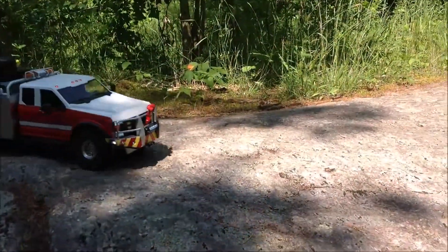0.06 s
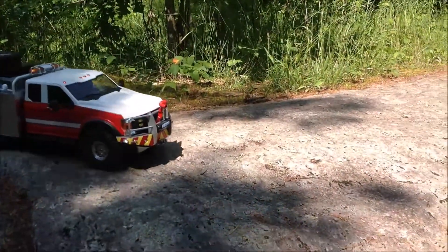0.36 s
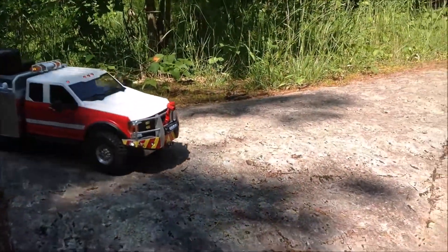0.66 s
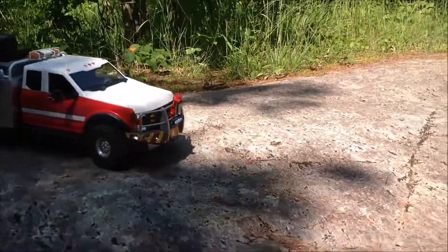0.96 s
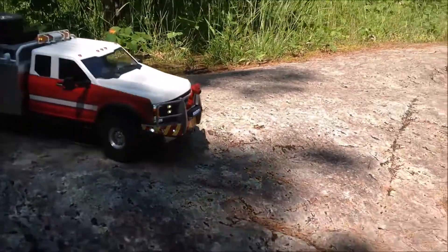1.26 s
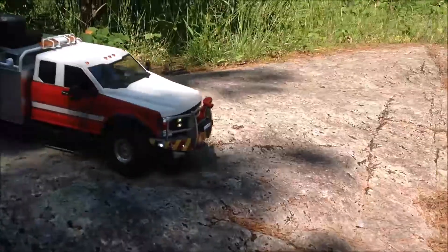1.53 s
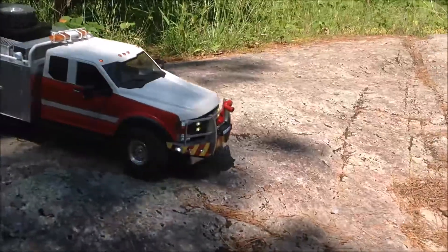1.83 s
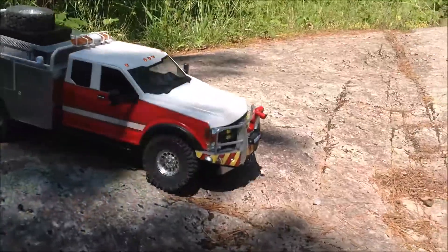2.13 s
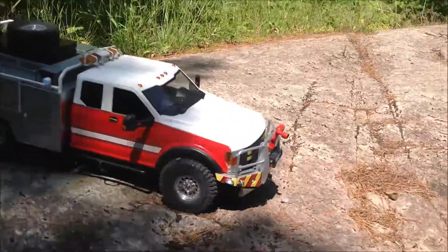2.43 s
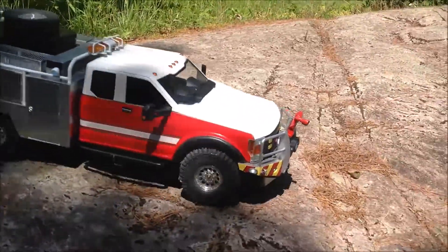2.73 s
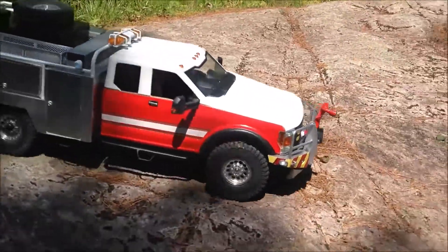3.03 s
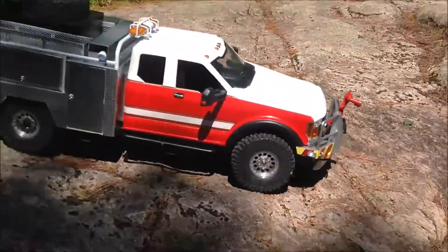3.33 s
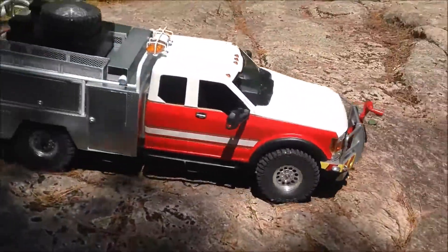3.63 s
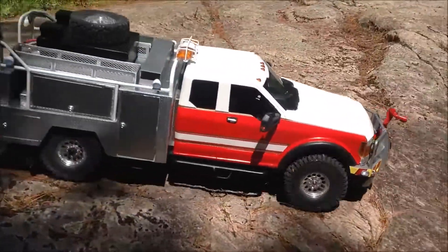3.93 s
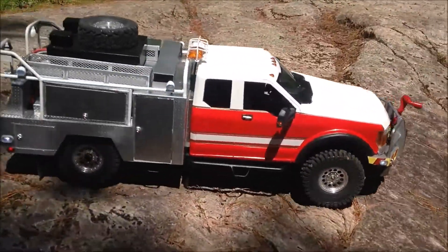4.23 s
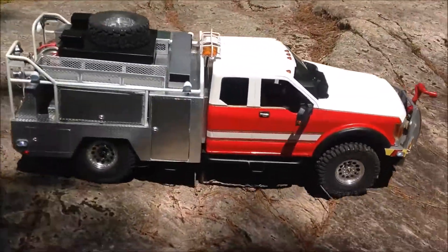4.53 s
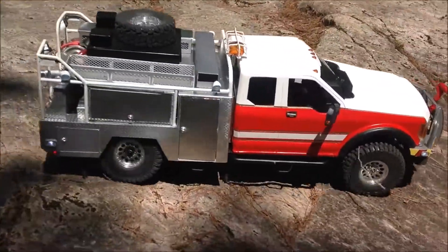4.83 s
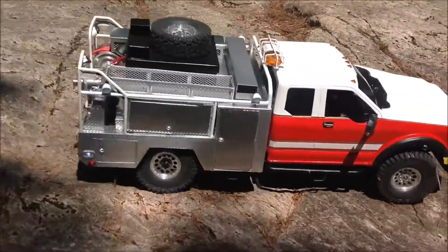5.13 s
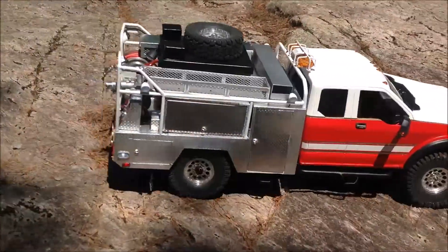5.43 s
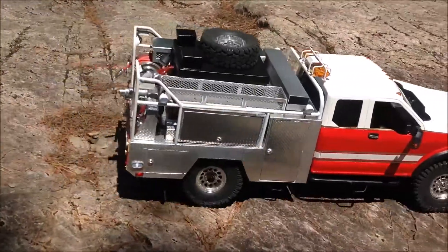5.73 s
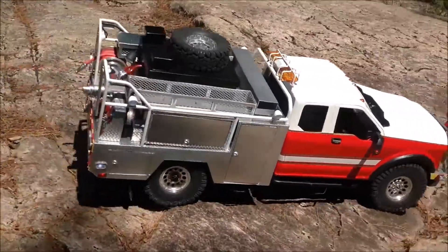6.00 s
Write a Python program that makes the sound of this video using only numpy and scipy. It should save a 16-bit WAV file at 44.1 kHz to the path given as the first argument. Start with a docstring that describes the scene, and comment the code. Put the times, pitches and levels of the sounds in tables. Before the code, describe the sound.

A small remote-controlled truck crawls over rock outdoors, heard close up for about six seconds. From the start, its electric motor and gears make a wavering, mid-pitched whine with a grinding rasp that pulses roughly twenty times a second. The whine steps up and down with the throttle, highest from about 1.9 to 2.5 seconds, then eases down. Around 4.3 seconds it drops lower and the pulsing slows; it picks up near 5.1 seconds and sags again just after 6. Tiny metallic pings and light clicks from the gears are scattered through, clustering between 2 and 3.5 seconds. A faint, thin, very high motor whistle swells around 1.4 seconds and again near 4. Underneath, rubber tyres scuff dully and quietly on the stone, and a low, steady hush of air and distant foliage continues throughout.

```python
"""Outdoors on bare rock, a radio-controlled truck crawls close by over a low, steady hush.
Its electric motor drives a slightly off-centre gear. The teeth whine at their meshing rate and rasp
where they bind, once a turn, forcing the gearbox, gear cover and body shell into resonance.
Teeth ping and snap free, the rubber tyres scuff, and twice the motor brushes sing thinly."""
import sys
import numpy as np
from scipy import signal
from scipy.fft import rfft, irfft, next_fast_len
from scipy.io import wavfile

SR = 44100
rng = np.random.default_rng(int(sys.argv[2]) if len(sys.argv) > 2 else 0)


def dump_mix(stems):
    """Bounce the given channels to the path in sys.argv[1] as a 16-bit WAV at rate SR."""
    frames = np.atleast_2d(stems).T  # one column per channel
    limited = np.clip(frames, -1, 1)  # hard clip at full scale
    pcm = np.round(limited * 32767).astype(np.int16)
    wavfile.write(sys.argv[1], SR, pcm)


N = 276066
TIME = np.arange(N) / SR

# spectrum of the outdoor background: frequency_hz, relative_db
HUSH_SPECTRUM = [(25, -36), (55, -30), (70, -23), (88, -11), (100, -10), (120, -8.5), (190, 0.5),
                 (300, -0.5), (420, -8.5), (700, -10), (1200, -6), (3000, -9), (6000, -66), (15000, -66)]
# rotation of the off-centre gear under the throttle: time_s, turns_per_s
GEAR_SPEED = [(0.0, 17.35), (0.31, 19.66), (0.38, 18.35), (1.08, 16.71), (1.17, 18.73), (1.38, 20.96),
              (1.57, 19.44), (1.74, 21.17), (2.37, 21.93), (2.8, 20.21), (3.08, 20.17), (3.26, 18.42),
              (3.6, 21.08), (3.77, 18.14), (4.22, 17.93), (4.28, 13.82), (4.48, 15.2), (4.68, 13.9),
              (4.97, 15.08), (5.06, 18.49), (5.27, 16.63), (5.56, 18.29), (6.05, 15.72), (6.26, 12.28)]
# meshing rate before the binds bend it, rising at each blip of the throttle: time_s, pitch_hz
WHINE_PITCH = [(.07, 772), (.18, 935), (.33, 890), (.6, 890), (.8, 770), (.95, 770), (1.02, 885),
               (1.19, 885), (1.3, 938), (1.7, 915), (1.9, 1150), (1.97, 980), (2.06, 990), (2.11, 1070),
               (2.42, 1098), (2.52, 1085), (2.57, 965), (3.05, 945), (3.26, 885), (3.32, 938), (3.42, 925),
               (3.56, 960), (3.62, 1000), (3.7, 925), (3.9, 870), (4.16, 892), (4.22, 785), (4.37, 665),
               (4.51, 728), (4.62, 660), (4.76, 645), (4.97, 742), (5.12, 900), (5.2, 815), (5.37, 805),
               (5.5, 860), (5.65, 882), (5.85, 755), (5.98, 800), (6.14, 648)]
# load on the drive train: time_s, rasp_at_bind_db, grinding_between_db, whine_relative_db
DRIVE_LOAD = [(0.0, -28.5, -45.5, -20), (0.18, -24, -25, -10), (0.26, -26.5, -38.5, -16),
              (0.89, -26.5, -41.5, -20.5), (1.35, -24, -27.5, -11), (1.59, -26, -37.5, -21),
              (1.75, -22.5, -24, -11), (1.95, -27.5, -33, -17), (2.05, -23.5, -26.5, -15),
              (3.12, -21.5, -27, -10.5), (3.2, -21.5, -36.5, -13.5), (3.28, -19.5, -28, -10.5),
              (3.58, -23.5, -24.5, -7), (3.72, -24, -33.5, -10), (4.11, -21.5, -24.5, -12),
              (4.21, -23.5, -43, -13), (4.45, -28, -31.5, -5), (4.71, -24.5, -41, -9),
              (4.79, -27.5, -31, -6), (5.09, -21.5, -24.5, -7), (5.17, -23, -32.5, -10.5),
              (5.52, -23, -27, -8), (5.78, -23, -33, -10), (5.92, -24.5, -28, -12), (6.12, -27, -41.5, -12),
              (6.26, -22, -41, -5)]
# jolts that make a bind bite harder or slip past: time_s, rasp_change_db
JOLTS = [(.384, -15), (.436, 1), (.6, 0.5), (.776, -13), (1.528, -9.5), (1.63, -7), (1.872, 1), (1.961, -3),
         (2.425, -5.5), (2.47, -0.5), (3.26, -2.5), (3.37, -4.5), (3.42, -1.5), (3.47, -0.5), (3.82, -6.5),
         (3.88, 1.5), (4.41, -1), (4.48, 3.5), (5.43, -1.5), (6.072, -25)]
# sidebands and tones of the other gears: tooth_rate_multiple, relative_db, blur_hz
GEAR_PARTIALS = [(.85, -9, 45.4), (1.1, -7.5, 50.3), (1.6, -13, 50), (1.91, -9, 44.2), (2.05, -10.5, 45),
                 (2.55, -14, 50), (2.8, -12, 45), (3.27, -9.5, 44), (4.14, -8, 50), (5.13, -12, 55)]
# broad response of the gearbox: frequency_hz, relative_db
GEARBOX_SPECTRUM = [(40, -70), (150, -23), (400, -20.5), (640, -3), (1000, -5), (1230, -4), (1500, -0.5),
                    (1850, -0.5), (2090, 1), (2400, 4.5), (3150, 0.5), (3500, -1), (3900, -2), (4300, -5),
                    (5000, -15.5), (5700, -29), (15000, -12.5)]
# its resonances: centre_hz, width_hz, lift_db
GEARBOX_MODES = [(635, 49, 5), (2370, 90, 1.5), (3570, 70, 2.5), (3770, 90, 5.5), (4650, 130, 6),
                 (7030, 130, 4), (7600, 290, 5.5), (9170, 220, 4)]
# harmonics of the whine: tooth_rate_multiple, relative_db
OVERTONES = [(2, 1), (3, -0.5), (4, -4), (5, -5)]
# how clearly they ring out of the rattle: time_s, relative_db
OVERTONE_CLARITY = [(0, -14), (.18, -8), (.4, -15), (1.1, -15), (1.35, -9), (1.6, -14), (1.75, -10),
                    (2.3, -10), (2.65, -12), (3.0, -8), (3.2, -10), (3.35, -6), (3.65, -7), (3.8, -12),
                    (4.1, -9), (4.3, -12), (4.5, -8), (4.85, -7), (5.1, -7), (5.25, -11), (5.55, -7),
                    (5.8, -11), (6.26, -11)]
# gear train resonances that they glide across: frequency_hz, gain_db
TRAIN_RESPONSE = [(1250, 1), (1450, -1), (1620, -5), (1750, -1), (1900, 2), (2150, -6), (2380, -8),
                  (2550, -1), (2780, 1), (3000, -2), (3250, -1), (3500, -7), (3800, 3), (4100, -5),
                  (4400, -12), (4650, -2), (5200, -14)]
# excitation of the gear cover: time_s, relative_db
COVER_DRIVE = [(0, -4.5), (.6, -14.5), (1.3, -5.5), (1.75, -11), (2.15, -4.5), (2.6, -8.5), (3.3, -28),
               (3.9, -9.5), (4.35, -5.5), (4.7, -8.5), (4.95, -25), (5.7, -11), (6.26, -23)]
# excitation of the shell's main mode as the chassis flexes: time_s, relative_db
SHELL_DRIVE = [(0, -12), (.3, -10), (.5, 0), (.9, -6), (1.15, -1), (1.4, -9.5), (2, -3), (3, -10.5),
               (3.6, -5.5), (4, -1), (4.3, -8), (4.8, -4), (5.1, -5.5), (5.5, -2), (5.9, -4), (6.26, 0)]
# spectrum of teeth sliding on each other: frequency_hz, relative_db
SCRAPE_SPECTRUM = [(60, -64), (1000, -38), (3000, 2.5), (5000, 6), (6300, 2.5), (8500, 2.5), (10500, 0.5),
                   (13000, -2), (14500, 0), (15300, 2.5)]
# tyres rubbing over the rock: time_s, level_db
TYRE_LEVEL = [(0, -53), (1.1, -54), (1.35, -44), (1.5, -49), (1.65, -41), (1.8, -49), (2.5, -46),
              (3.5, -47), (4.5, -50), (5.2, -51.5), (5.5, -44.5), (6.0, -47.5), (6.26, -60)]
# their dull spectrum: frequency_hz, relative_db
TYRE_SPECTRUM = [(100, -67), (300, -4), (480, 4), (600, 5.5), (800, -1), (1500, -27), (5000, -75)]
# metallic pings of the gears: peak_s, pitch_hz, relative_db
PINGS = [(0.014, 3171, -27.5), (0.125, 2610, -23.5), (.187, 2890, -27.5), (0.894, 3225, -28.5),
         (1.237, 2690, -23.5), (1.285, 2860, -26), (1.733, 3020, -22.5), (2.059, 2977, -19.5),
         (2.153, 2970, -21), (2.38, 3340, -29), (2.428, 3300, -28), (2.52, 3180, -25), (2.569, 3320, -28),
         (2.662, 3200, -25.5), (3.106, 3790, -33), (3.267, 2540, -22.5), (3.316, 3770, -24),
         (3.341, 2760, -26), (3.369, 1890, -23), (3.473, 3740, -30), (4.045, 2630, -23.5),
         (4.112, 2770, -30), (5.088, 2560, -26), (5.494, 2503, -22), (5.545, 2600, -29), (5.644, 2680, -24)]
# teeth that catch and snap free: start_s, force_db
SNAPS = [(.123, -22), (1.067, -37), (1.233, -23.5), (2.055, -22), (2.424, -18), (3.056, -18), (3.363, -18),
         (3.416, -30), (3.469, -17), (3.765, -25), (5.369, -22)]
# spells of brush singing: start_s, peak_s, end_s, level_db, first_hz, last_hz
BRUSH_SPELLS = [(1.0, 1.36, 1.56, -42.5, 9330, 8950), (3.5, 4.08, 4.16, -42, 9220, 9260)]


def amp(db):
    """Amplitude ratio of a level in decibels."""
    return 10 ** (np.asarray(db) / 20)


def unit_rms(x):
    """Normalisation to an rms of 1."""
    return x / np.sqrt(np.mean(x ** 2) + 1e-20)


def curves(rows):
    """Linear interpolation of each column of a time table."""
    times, *columns = np.transpose(rows)
    return [np.interp(TIME, times, column) for column in columns]


def wander(hz):
    """Low-pass noise: random motion of rms 1, no faster than about hz."""
    step = 8
    size = next_fast_len(N // step)
    f = np.fft.rfftfreq(size, step / SR)
    slow = irfft(rfft(rng.standard_normal(size)) / (1 + (f / hz) ** 4), size)
    return unit_rms(np.interp(np.arange(N), step * np.arange(size), slow))


def blurred_tone(cycles, blur_hz):
    """Random modulation of amplitude and phase spreads a tone into a narrow band."""
    phase = 2 * np.pi * cycles
    return wander(blur_hz) * np.cos(phase) + wander(blur_hz) * np.sin(phase)


def colour(x, spectrum, modes=()):
    """Minimum-phase filter of unit energy: a broad spectrum with resonances that ring on."""
    f = abs(np.fft.fftfreq(4096, 1 / SR))
    hz, db = np.transpose(spectrum)
    shape_db = np.interp(np.log(f + 1), np.log(hz), db)
    for centre, width, lift in modes:
        shape_db += lift / (1 + (2 * (f - centre) / width) ** 2)
    log_response = np.conj(signal.hilbert(np.log(amp(shape_db))))
    taps = np.fft.ifft(np.exp(log_response)).real
    return signal.oaconvolve(x, taps / np.linalg.norm(taps))[:N]


def resonate(x, hz, width_hz):
    """Forced response of one damped mode of unit energy."""
    b, a = signal.iirpeak(hz, hz / width_hz, fs=SR)
    return signal.lfilter(b, a, x) * np.sqrt(SR / (np.pi * width_hz))


def hush(level_db=-41.5):
    """Broadband noise of air and distant foliage, almost constant in level."""
    return amp(level_db + .4 * wander(4)) * colour(rng.standard_normal(N), HUSH_SPECTRUM)


def gear_turns(first_bind_turns=.2016):
    """Rotation is the integral of speed; the off-centre gear binds at each whole turn."""
    return np.cumsum(curves(GEAR_SPEED)[0]) / SR - first_bind_turns


def gear_binds(typical_s=.0175, jolt_reach_s=.02):
    """Eccentricity binds the gear once a turn. Rows: time_s, length_s, rasp_db, grinding_after_db."""
    turns = gear_turns()
    times = np.interp(np.arange(int(turns[-1]) + 1), turns, TIME)
    rasp_db, grinding_db, _ = curves(DRIVE_LOAD)
    longer, harder, looser = rng.standard_normal((len(times), 3)).T
    jolt_db = sum(db * (abs(times - at) < jolt_reach_s) for at, db in JOLTS)
    length_s = typical_s * np.exp(.14 * longer)
    bind_db = np.interp(times, TIME, rasp_db) + jolt_db + .6 * harder
    after_db = np.interp(times + np.gradient(times) / 2, TIME, grinding_db) + .7 * looser
    return np.transpose([times, length_s, bind_db, after_db])


def tooth_rate(sag=.032, lag_turns=.04):
    """Frequency modulation: each bind brakes the motor, so the meshing rate sags and recovers."""
    return curves(WHINE_PITCH)[0] * (1 - sag * np.sin(2 * np.pi * (gear_turns() - lag_turns)))


def tooth_force(binds, lead_s, rise, fall, rasp_db, loose_db, rebound_db,
                rebound_turns=.46, rebound_s=.0087):
    """Binds, loose grinding and rebounds add in power; rise and fall are shares of a bind's length."""
    times, _, _, grinding_db = np.transpose(binds)
    turn_s = np.gradient(times)
    angle = 2 * np.pi * np.interp(TIME, times, np.arange(len(times)))
    slack_db = .5 * np.maximum(-np.sin(angle), 0) ** 2  # the teeth run freest before they bind
    power = amp(np.interp(TIME, times + turn_s / 2, grinding_db) + loose_db + slack_db) ** 2
    for (at, length_s, bind_db, after_db), period_s in zip(binds, turn_s):
        near = slice(max(int(at * SR) - SR // 20, 0), int(at * SR) + SR // 10)
        t = TIME[near] - at + lead_s
        swell = np.exp(-(t / (length_s * np.where(t < 0, rise, fall))) ** 2)
        rebound = np.exp(-((t - rebound_turns * period_s) / rebound_s) ** 2)
        power[near] += amp(bind_db + rasp_db) ** 2 * swell + amp(after_db + rebound_db) ** 2 * rebound
    return np.sqrt(power)


def impacts(teeth, uneven_db=4, jitter_teeth=.028):
    """Impulse train: each tooth lands a little early or late and with uneven strength."""
    count = np.floor(teeth + jitter_teeth * wander(500))
    lands = np.diff(count, prepend=count[0]) > 0
    return unit_rms(lands * amp(uneven_db * np.clip(rng.standard_normal(N), -2, 2)))


def friction(teeth, fade_teeth=.45, steady=.49, grit_db=2):
    """Sliding friction makes noise that flares as each tooth engages."""
    flare = steady + np.exp(-(teeth % 1) / fade_teeth)
    return unit_rms(flare * rng.standard_normal(N) * amp(grit_db * wander(460)))


def gearbox_rattle(teeth, force, clarity):
    """Forced vibration of the gearbox under impacts, friction and meshing tones."""
    grinding = amp(-9.5) * impacts(teeth) + amp(-5.5) * friction(teeth)
    grinding *= amp(-8 * clarity)  # the clearer the overtones, the less the teeth grind
    tones = sum(amp(db + 3 * wander(7)) * blurred_tone(multiple * teeth, blur_hz)
                for multiple, db, blur_hz in GEAR_PARTIALS)
    return colour(force * (grinding + amp(-12.5) * tones), GEARBOX_SPECTRUM, GEARBOX_MODES)


def overtone(teeth, multiple, db):
    """A gliding harmonic of the whine grows wherever it meets a resonance of the gear train."""
    lift_db = np.interp(multiple * tooth_rate(), *np.transpose(TRAIN_RESPONSE))
    swell_db = 3 * wander(7)  # each meshing tone swells and fades as the shafts shift
    return amp(db + lift_db + swell_db) * np.cos(2 * np.pi * multiple * teeth + .6 * wander(20))


def cover_ring(teeth, force):
    """Resonance of the gear cover, excited by tooth friction."""
    return resonate(force * amp(curves(COVER_DRIVE)[0]) * friction(teeth), hz=3000, width_hz=110)


def shell_ring(teeth, binds):
    """Resonance of the body shell, sustained by friction even between the binds."""
    flex = tooth_force(binds, lead_s=0, rise=.35, fall=.6, rasp_db=0, loose_db=-2, rebound_db=-1)
    drive = flex * amp(curves(SHELL_DRIVE)[0]) * friction(teeth)
    return amp(-5) * resonate(drive, hz=1695, width_hz=70)


def flank_hiss(teeth, binds, db_per_octave=4.5, cruise_hz=900):
    """Friction noise grows with sliding speed; the flanks start to scrape just before they bind."""
    rub = tooth_force(binds, lead_s=.0017, rise=.34, fall=.46, rasp_db=1.74, loose_db=-.5, rebound_db=-1)
    rub *= amp(1.5 * wander(22))
    scrape = rub * friction(teeth, fade_teeth=.89, steady=1, grit_db=1.5)
    gain_db = -7 + db_per_octave * np.log2(curves(WHINE_PITCH)[0] / cruise_hz)
    return amp(gain_db) * colour(scrape, SCRAPE_SPECTRUM, GEARBOX_MODES)


def whine(teeth, binds):
    """The meshing fundamental: a heavy vibration that swells at each bind and outlasts the rattle."""
    sway = tooth_force(binds, lead_s=-.0005, rise=.37, fall=.62, rasp_db=.5, loose_db=-9, rebound_db=-6)
    tone = amp(5) * np.cos(2 * np.pi * teeth) + amp(-1.5) * blurred_tone(teeth, blur_hz=70)
    return sway * amp(curves(DRIVE_LOAD)[2]) * tone


def gears():
    """Periodic meshing: one running count of teeth times the rattle, ringing, hiss and whine."""
    binds = gear_binds()
    teeth = np.cumsum(tooth_rate() * (1 + .009 * wander(45))) / SR
    clarity = amp(curves(OVERTONE_CLARITY)[0])
    force = tooth_force(binds, lead_s=.001, rise=.28, fall=.49, rasp_db=.6, loose_db=-4.5,
                        rebound_db=-1, rebound_turns=.48, rebound_s=.007)
    rattle = gearbox_rattle(teeth, force, clarity)
    overtones = force * clarity * sum(overtone(teeth, multiple, db) for multiple, db in OVERTONES)
    ringing = cover_ring(teeth, force) + shell_ring(teeth, binds)
    return rattle + overtones + ringing + flank_hiss(teeth, binds) + whine(teeth, binds)


def tyres():
    """Friction of soft rubber lugs on rock makes a dull, uneven murmur."""
    scuff_db = 3 * wander(29)
    return amp(curves(TYRE_LEVEL)[0] + scuff_db) * colour(rng.standard_normal(N), TYRE_SPECTRUM)


def pings(swell_s=.0056, gain_db=3):
    """Resonant build-up: a few teeth strike in step with a mode, which swells and dies."""
    out = np.zeros(N)
    for at, hz, db in PINGS:
        near = slice(max(int(at * SR) - SR // 20, 0), int(at * SR) + SR // 20)
        t = TIME[near] - at
        out[near] += amp(db + gain_db) * np.exp(-.5 * (t / swell_s) ** 2) * np.sin(2 * np.pi * hz * t)
    return out


def snaps(rise_s=.001, decay_s=.0069):
    """Transient excitation: a caught tooth lets go and the gearbox answers with a hard clack."""
    force = np.zeros(N)
    for at, db in SNAPS:
        t = np.maximum(TIME - at, 0)
        force += amp(db) * np.minimum(t / rise_s, 1) * np.exp(-np.minimum(t / decay_s, 20))
    return colour(force * rng.standard_normal(N), GEARBOX_SPECTRUM, GEARBOX_MODES)


def brushes(flicker_db=4):
    """Friction-induced vibration: brushes on the commutator sing fitfully in a high, sliding band."""
    out = np.zeros(N)
    for start, peak, end, db, first_hz, last_hz in BRUSH_SPELLS:
        swell = np.interp(TIME, [start, peak, end], [0, 1, 0])
        cycles = np.cumsum(np.interp(TIME, [start, end], [first_hz, last_hz])) / SR
        out += swell * amp(db + flicker_db * wander(70)) * blurred_tone(cycles, blur_hz=190)
    return out


def scene():
    """Superposition of the truck's sounds and the outdoor hush in one channel."""
    return (gears() + snaps() + pings() + brushes() + tyres() + hush())[None]


def record(dry, cutoff_hz=15380):
    """Band limiting: a linear-phase low-pass filter removes the highest treble."""
    taps = signal.firwin(601, cutoff_hz, window=("kaiser", 9), fs=SR)
    return signal.oaconvolve(dry, taps[None], "same")


dry = scene()
out = record(dry)
dump_mix(out)
```